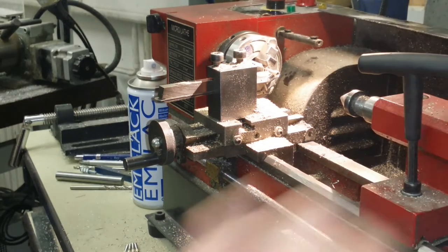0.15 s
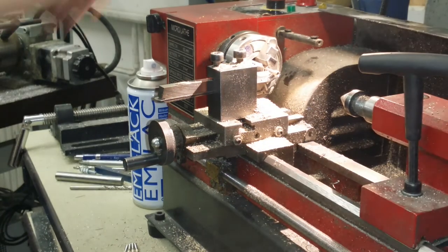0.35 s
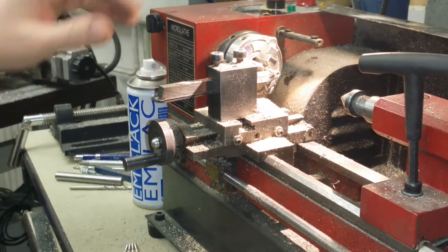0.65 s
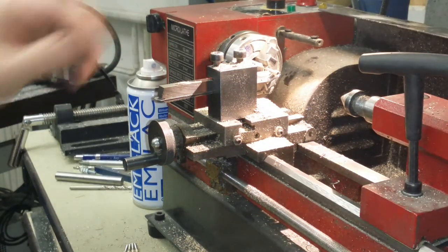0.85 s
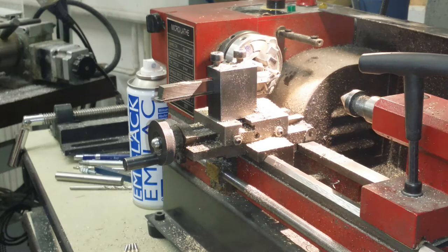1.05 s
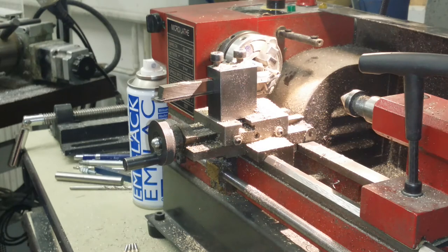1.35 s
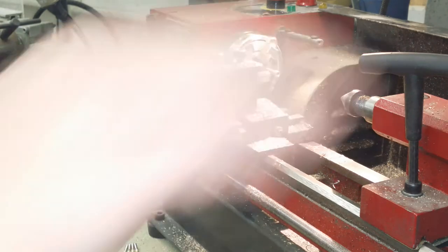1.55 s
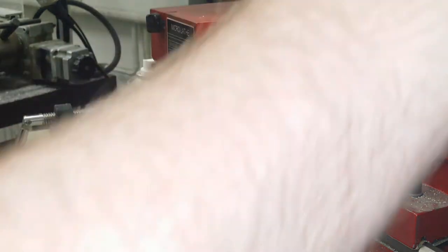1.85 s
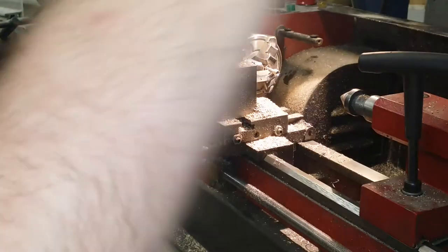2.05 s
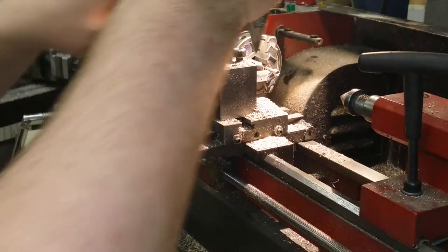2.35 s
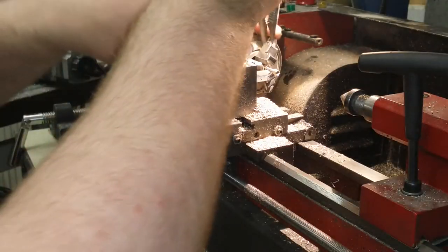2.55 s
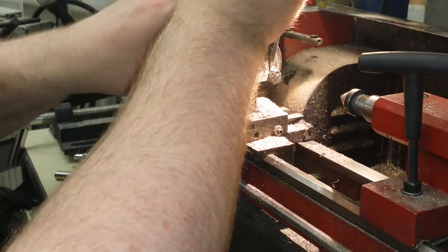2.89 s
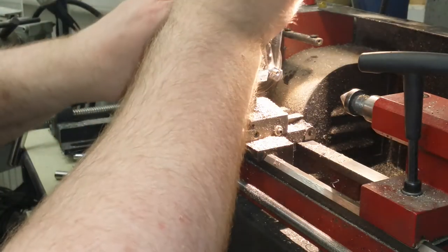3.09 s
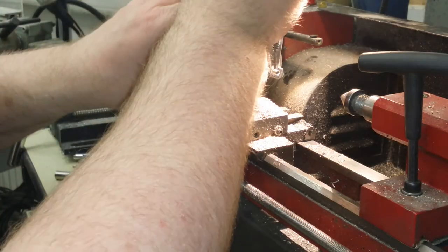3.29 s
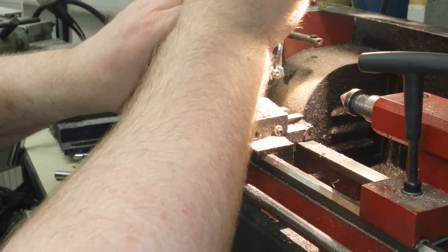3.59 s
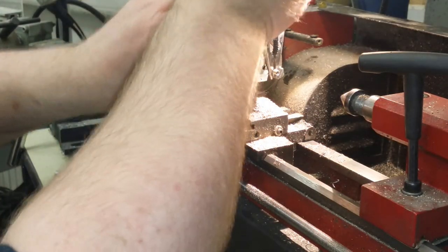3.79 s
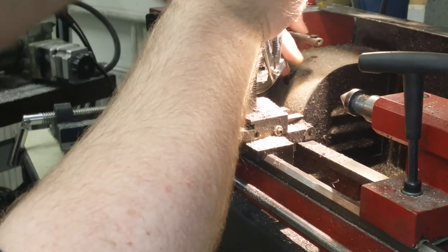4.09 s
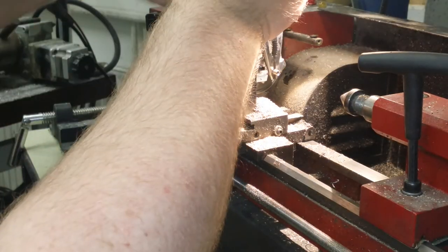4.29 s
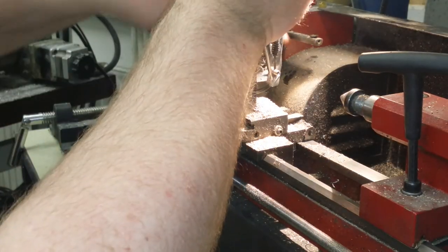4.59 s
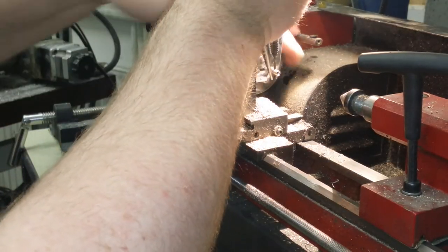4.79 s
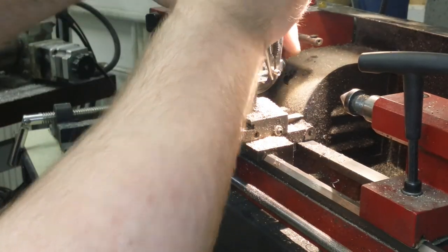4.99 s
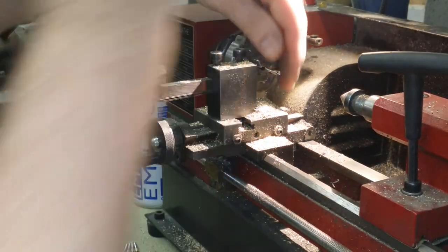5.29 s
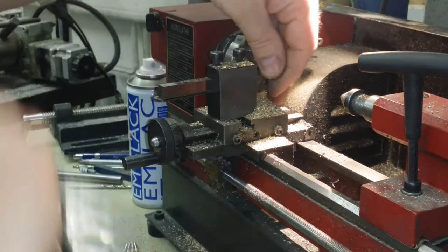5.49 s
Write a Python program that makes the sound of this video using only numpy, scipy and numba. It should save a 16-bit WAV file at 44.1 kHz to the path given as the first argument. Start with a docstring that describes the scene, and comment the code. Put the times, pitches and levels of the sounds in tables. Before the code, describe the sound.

An idle lathe's cooling fan whines steadily over mains hum and airy noise. About two seconds in, a tool rasps briefly across a gritty bench and knocks down hard, close on the right. The background dips after the blow and creeps back. Hands then work at the chuck, making soft knocks and bright clicks of small steel parts, with a sharper click near the end. The workshop adds a short echo.

```python
"""A cooling fan whines over mains hum in an idle lathe, its air noise resonating in the housing.
A tool is dragged off the bench, rasping on grit, and knocks down hard close on the right: the bench
rings and rumbles, and the microphone's gain control ducks and recovers. Hands then work at the chuck
with soft knocks and clicks of small steel parts. Faint rustles and a hiss come and go,
and the workshop walls echo the contacts."""
import sys
import numpy as np
from scipy import signal
from scipy.fft import rfft, irfft, next_fast_len
from scipy.io import wavfile
from scipy.ndimage import uniform_filter1d, map_coordinates
from numba import njit

SR = 44100
rng = np.random.default_rng(int(sys.argv[2]) if len(sys.argv) > 2 else 0)


def put_to_file(sound):
    """Save the sound as 16-bit audio at rate SR, in the file named by the first command-line argument."""
    columns = np.atleast_2d(sound).T  # one column per channel
    safe = np.clip(columns, -1, 1)
    whole_steps = np.round(safe * 32767)
    wavfile.write(sys.argv[1], SR, whole_steps.astype(np.int16))


N = 248724
TIME_S = np.arange(N) / SR
CHUCK_FROM_S, CHUCK_PAN_DB = 2.3, -5.5  # pan: left minus right


def amp(db):
    """dB to gain."""
    return 10 ** (np.asarray(db) / 20)


def unit(x):
    """Scale to rms 1."""
    return x / np.sqrt(np.mean(x ** 2) + 1e-20)


def along(points, hz):
    """Interpolate (Hz, value) points on a log axis."""
    f, v = np.transpose(points)
    return np.interp(np.log(hz + 1), np.log(f + 1), v)


def wobble(rate_hz):
    """Smooth random curve, rate_hz knots a second."""
    knots = rng.standard_normal(int(N * rate_hz / SR) + 4)
    return map_coordinates(knots, [np.arange(N) * rate_hz / SR])


def filtered(x, response):
    """Apply a complex frequency response."""
    n = x.shape[-1]
    m = next_fast_len(n + 8192)
    return irfft(rfft(x, m) * response(np.fft.rfftfreq(m, 1 / SR)), m)[..., :n]


def peak(f, hz, width_hz):
    """One resonance, gain 1 at its centre."""
    return 1j * f * width_hz / (hz * hz - f * f + 1j * f * width_hz)


def band(x, hz, width_hz):
    """Two-stage band-pass, scaled to rms 1."""
    return unit(filtered(x, lambda f: peak(f, hz, width_hz) ** 2))


def sides(pan_db):
    """Left and right gains, one row each."""
    return amp(np.array([[.5], [-.5]]) * pan_db)


def swells(rows, rest_db):
    """Resting gain plus one Gaussian hump per row."""
    humps = sum(amp(2 * db) * np.exp(-((TIME_S - s) / half_s) ** 2) for s, db, half_s in rows)
    return np.sqrt(amp(2 * rest_db) + humps)


def tone(hz, db, pan_db, lead_rad, waver_db, drift_rad):
    """Slightly unsteady stereo sine."""
    phase = 2 * np.pi * hz * TIME_S + drift_rad * wobble(6) + rng.uniform(0, 2 * np.pi)
    pair = np.sin(phase + np.array([[0], [lead_rad]]))
    return np.sqrt(2) * amp(db + waver_db * wobble(10)) * sides(pan_db) * pair


# Shaft harmonics: (multiple, level [dB], pan [dB], right lead [rad])
FAN_HARMONICS = [(6, -60, 1, 0.25), (7, -50.5, -10.5, 0.22), (8, -53, -7.5, 2.39)]


def fan_whine(shaft_hz=95.5):
    """Seven blades: the blade-pass tone and its two neighbours."""
    return sum(tone(k * shaft_hz, db, pan_db, lead_rad, waver_db=1.3, drift_rad=0.45)
               for k, db, pan_db, lead_rad in FAN_HARMONICS)


# Mains harmonics: (multiple, level [dB], pan [dB])
MAINS_HARMONICS = [(2, -52, -4.5), (6, -77.5, 24), (9, -65.5, 5.5), (17, -71, -16)]


def mains_hum(mains_hz=50):
    """Hum at multiples of the supply frequency."""
    return sum(tone(k * mains_hz, db, pan_db, lead_rad=0, waver_db=1.15, drift_rad=0.3)
               for k, db, pan_db in MAINS_HARMONICS)


# Fan and workshop air: (frequency [Hz], relative density [dB])
AIR_SPECTRUM = [(18, -52), (30, -18.5), (69, -18.5), (115, -15.5), (190, -8), (256, -7.5), (360, -15),
                (500, -6.5), (675, -3.5), (949, -12), (1370, -7), (3330, -21), (5620, -20), (7500, -27),
                (14400, -39), (15600, -34)]
# Housing resonances: (frequency [Hz], width [Hz], level [dB])
HOUSING_MODES = [(141, 24, -58.5), (237.4, 12, -52), (274.6, 14.6, -56), (553, 23, -62), (607, 22, -59.5),
                 (708, 110, -53.5), (1464, 305, -73), (2760, 650, -60.5), (5610, 470, -66.5),
                 (9020, 470, -70)]
# Air coherence: (frequency [Hz], left-right correlation)
AIR_COHERENCE = [(60, 0.82), (130, 0.94), (290, 0.83), (640, 0.44), (1410, -0.18), (3100, 0.16),
                 (6820, -0.22), (15000, 0.24)]
# Air balance: (frequency [Hz], pan [dB])
AIR_PAN = [(60, -18), (110, 7.5), (200, -10), (380, -6.5), (700, -3.5), (1290, -2), (2380, -3.5),
           (4400, 7.5), (8120, -4.5), (15000, -2)]


def fan_air():
    """Patchy air noise that resonates in the housing."""
    def colour(f):
        housing = sum(amp(2 * db) * SR / (np.pi * width_hz) * abs(peak(f, hz, width_hz)) ** 4
                      for hz, width_hz, db in HOUSING_MODES)
        return np.sqrt(amp(2 * (along(AIR_SPECTRUM, f) - 28.5)) + housing)

    def spread(f):
        angle = np.arccos(np.clip(along(AIR_COHERENCE, f), -1, 1)) / 2
        return [np.cos(angle), np.sin(angle)]

    spectra = signal.stft(rng.standard_normal((2, N)), nperseg=512)[2]
    patches = uniform_filter1d(rng.standard_normal(spectra.shape[1:]), size=6, axis=0)
    patches = uniform_filter1d(patches, size=12, axis=1)
    noise = signal.istft(spectra * amp(1.17 * unit(patches)), nperseg=512)[1][:, :N]
    mid, side = filtered(noise, lambda f: colour(f) * spread(f))
    air = filtered(np.array([mid + side, mid - side]), lambda f: sides(along(AIR_PAN, f)))
    return amp(.6 * wobble(2.5)) * air


# Rattle bands of the steel parts: (frequency [Hz], width [Hz], level [dB], t60 [s])
STEEL_BANDS = [(3120, 2200, -4, 0.041), (4420, 1400, -7, 0.035), (5020, 580, -6.5, 0.036),
               (5900, 970, -11.5, 0.064), (7900, 1300, -2, 0.04), (9500, 1800, -7, 0.028),
               (12170, 1700, -5.5, 0.026), (14500, 1500, -7, .035)]
# Clear rings of the same parts: (frequency [Hz], level [dB], t60 [s])
STEEL_PINGS = [(4080, -3, 0.051), (4400, -1.5, 0.041), (5065, -1, 0.059), (5800, -1.5, 0.074),
               (7950, -4, .06), (9200, -7, .06)]
# Steel click pitches: (time [s], level [dB], centre [Hz], roll-off [dB/octave]) # Rows a millisecond apart are
# two quick contacts, one just after the other.
CLICK_PITCHES = [(0.408, -56, 9500, 10), (1.846, -28.5, 11900, 11.5), (1.859, -38, 8400, 7),
                 (2.041, -44.5, 9460, 15), (2.055, -51, 7500, 4), (2.776, -45.5, 5600, 16),
                 (2.914, -31, 5120, 36), (2.916, -44, 9300, 14), (2.926, -33.5, 5670, 26),
                 (2.972, -52, 8000, 12), (2.997, -42, 5070, 42), (3.011, -40, 5100, 38),
                 (3.144, -39, 5970, 32.5), (3.389, -41.5, 3320, 11), (4.336, -45.5, 5600, 4),
                 (4.44, -54, 11000, 8), (4.821, -36, 4110, 45), (4.822, -42, 5730, 30),
                 (5.023, -49, 8500, 5.5), (5.069, -52, 7000, 5), (5.195, -25.5, 14500, 13.5),
                 (5.196, -26.5, 4400, 14), (5.26, -46, 4380, 40)]


def steel_clicks(ping_db=-6.5, ping_narrowing=4.6, tail_db=-15, attack_s=0.0012):
    """Steel on steel: the parts rattle and ping, most strongly near each row's pitch."""
    out, t = np.zeros((2, N + SR)), np.arange(SR // 9) / SR
    band_hz, width_hz, band_db, t60_s = np.transpose(STEEL_BANDS)[:, :, None, None]
    tail_t60_s = 0.27 * 5000 / band_hz
    fade = amp(-60 * t / t60_s) + amp(tail_db - 60 * t / tail_t60_s)
    band_gain = np.sqrt(2 * SR / (np.pi * width_hz))
    for s, db, centre_hz, rolloff in CLICK_PITCHES:
        loss_db = lambda hz: abs(rolloff * np.log2(hz / centre_hz))
        noise = rng.standard_normal((len(STEEL_BANDS), 2, len(t)))
        rings = filtered(noise, lambda f: peak(f, band_hz, width_hz) ** 2 * band_gain)
        rattle = (amp(band_db - loss_db(band_hz)) * fade * rings).sum(axis=0)
        pings = sum(amp(ping_db + ring_db - ping_narrowing * loss_db(hz) - 60 * t / ring_s)
                    * np.sin(2 * np.pi * hz * rng.normal(1, .006) * t)
                    for hz, ring_db, ring_s in STEEL_PINGS)
        click = amp(db) * (1 - np.exp(-t / attack_s)) * (rattle + pings)
        pan_db = -14 if s < CHUCK_FROM_S else -2.5
        out[:, round(s * SR):][:, :len(t)] += sides(pan_db) * click
    return out[:, :N]


# Hiss swells: (time [s], level [dB], half length [s])
HISS_SWELLS = [(1.2, -62, 0.217), (5.44, -60, 0.14)]


def hiss():
    """A faint narrow hiss comes and goes."""
    return swells(HISS_SWELLS, rest_db=-85) * band(rng.standard_normal((2, N)), hz=5520, width_hz=640)


# Treble swells: (time [s], level [dB], half length [s])
TREBLE_SWELLS = [(1.55, -64.5, 0.53), (3.39, -66, 0.051), (4.01, -61.5, 0.12), (4.37, -65, 0.13),
                 (5.23, -65.5, 0.0175)]


def treble_rustle():
    """Grainy rustles, and the bright fizz after the last loud click."""
    grain = rng.standard_normal((2, N)) * amp(2.0 * wobble(120))
    return swells(TREBLE_SWELLS, rest_db=-71.5) * band(grain, hz=13000, width_hz=9800)


# Balance of close sounds: (frequency [Hz], pan [dB])
NEAR_PAN = [(60, -16), (110, -17), (200, -14.5), (380, -11.5), (700, -14), (1290, -13.5), (2380, -5),
            (4400, 0), (8120, -12), (15000, -10)]


def near(x, lag_s=0.00036):
    """Close on the right: louder there, late on the left."""
    return filtered(x, lambda f: sides(along(NEAR_PAN, f)) * [np.exp(-2j * np.pi * f * lag_s), f ** 0])


# Bench modes: (frequency [Hz], level [dB], t60 [s])
BENCH_MODES = [(76, -28, 0.043), (137.6, -19, 0.089), (224, -10, 0.1), (327, 6, 0.031), (396, 3, 0.074),
               (487, -0.5, 0.097), (573, 10, 0.023), (622, -10.5, 0.046), (862, -5, 0.046),
               (1059, -3, 0.045), (1395, -3, 0.038), (1611, 1, 0.035), (1880, -5, 0.058),
               (2508, -3.5, 0.038), (3280, 0.5, 0.011)]


def bench_ring(t, centre_hz, rolloff, top_hz, build_cycles=0.31):
    """Bench modes, roughened by loose tools; a soft contact misses the high ones."""
    ring = np.zeros(len(t))
    for hz, db, t60_s in BENCH_MODES:
        octaves = np.log2(hz / centre_hz)
        polarity = np.sign(np.cos(np.pi * octaves))
        drive_db = -abs(rolloff * octaves) - 10 * np.log10(1 + (hz / top_hz) ** 8)
        decay = amp(db + drive_db + rng.normal(0, 0.15) - 60 * t / t60_s)
        build = 1 - np.exp(-t * hz / build_cycles)
        shiver_rad = 4e-5 * hz * np.cumsum(rng.standard_normal(len(t)))
        ring += polarity * decay * build * np.sin(2 * np.pi * hz * t + shiver_rad)
    return ring / abs(ring).max()


def stroke(centre_s, half_hold_s, rise_db_per_s, fall_db_per_s):
    """Drag gain: climbs, holds, drops as the tool lifts off."""
    early_s = np.maximum(centre_s - half_hold_s - TIME_S, 0)
    late_s = np.maximum(TIME_S - centre_s - half_hold_s, 0)
    return amp(-rise_db_per_s * early_s - fall_db_per_s * late_s)


# Grit rasp: (frequency [Hz], relative density [dB])
RASP_SPECTRUM = [(590, -15), (1000, -21), (1230, -14), (2450, -8), (4560, -15), (8290, -20.5), (11200, -26),
                 (12100, -25), (15600, -31)]


def tool_drag(start_s=1.77, end_s=1.903, shake_db=-23.5, rasp_db=-32):
    """Grit catches in short grains that shake the bench and rasp."""
    grit = rng.standard_normal((3, N)) * amp(2.1 * wobble(250))
    t = TIME_S[:SR // 20]
    ring = bench_ring(t, centre_hz=450, rolloff=47, top_hz=700) * amp(-60 * t / 0.173)
    shake = amp(shake_db) * unit(signal.fftconvolve(grit[0], ring)[:N])
    shake *= stroke(centre_s=1.858, half_hold_s=0.01, rise_db_per_s=440, fall_db_per_s=1500)
    rasp = amp(rasp_db) * unit(filtered(grit[1:], lambda f: amp(along(RASP_SPECTRUM, f))))
    rasp *= stroke(centre_s=1.868, half_hold_s=0.013, rise_db_per_s=320, fall_db_per_s=1700)
    touching = (TIME_S > start_s) & (TIME_S < end_s)
    return near(touching * (shake + rasp))


# Blows: (time [s], level [dB], centre [Hz], roll-off [dB/octave], upper reach [Hz])
BLOWS = [(1.797, -24.5, 77, 35, 200), (1.839, -24.5, 1500, 8, 3000), (1.8445, -15.5, 483, 21, 2000),
         (1.85, -25.5, 90, 24, 200), (1.8639, -15, 1020, 23, 3300), (1.8667, -16, 1900, 2.5, 3340),
         (1.9066, 1, 1501, 6, 4070), (1.928, -10, 404.7, 2, 800), (1.9334, -6.5, 432, 5, 900),
         (1.945, -22, 90, 25, 200), (1.958, -14.5, 600, 15, 1300), (2.78, -26, 243, -1, 900),
         (2.874, -21, 890, 12, 1500), (2.883, -23, 330, 14, 600), (3.1694, -28, 1180, 8, 2200),
         (3.175, -22, 416, 9, 1200), (3.202, -25.5, 450, -4, 810), (3.379, -30.5, 500, 7, 863),
         (3.405, -29.5, 1060, -6.5, 1284), (4.031, -32.5, 130, 18, 273), (4.074, -36, 130, 21.5, 200),
         (4.357, -35.5, 130, 18, 250)]


def knocks(crack_t60_s=.021):
    """Each blow rings the bench; harder contacts start faster and crack louder."""
    at_bench, at_chuck = np.zeros((2, 2, N + SR))
    t = np.arange(SR // 4) / SR
    for s, db, centre_hz, rolloff, top_hz in BLOWS:
        noise = rng.standard_normal(len(t)) + 1.1 * rng.standard_normal((2, len(t)))
        crack = filtered(noise, lambda f: peak(f, 3980, 2600) ** 3) * amp(-60 * t / crack_t60_s)
        crack_db = -32 + 14.5 * np.log2(top_hz / 1000)
        blow = bench_ring(t, centre_hz, rolloff, top_hz) + amp(crack_db) * crack
        attack = 1 - np.exp(-t * top_hz / 2)
        place = at_chuck if s > CHUCK_FROM_S else at_bench
        place[:, round(s * SR):][:, :len(t)] += amp(db) * attack * blow
    return near(at_bench[:, :N]) + sides(CHUCK_PAN_DB) * at_chuck[:, :N]


def body_note(start_s=1.9072, db=-9, from_hz=260, to_hz=560):
    """The hard blow's note slides up as the tool settles; a hand damps it."""
    attack_s, slide_s, t60_s = .001, .011, .35
    hold_s, mute_db_per_s = .018, 2000
    t = np.maximum(TIME_S - start_s, 0)
    hz = to_hz - (to_hz - from_hz) * np.exp(-t / slide_s)
    decay_db = 60 * t / t60_s + mute_db_per_s * np.maximum(t - hold_s, 0)
    envelope = amp(db - decay_db + 2.5 * wobble(150)) * (1 - np.exp(-t / attack_s))
    return near(envelope * np.sin(2 * np.pi * np.cumsum(hz * (t > 0)) / SR))


# Low rumbles: (time [s], level [dB], half length [s])
LOW_RUMBLES = [(1.97, -52, 0.06), (3.6, -65, 0.11), (4.3, -72, 0.65), (5.22, -68, .06)]


def low_rumble():
    """A low rumble follows the hard knock and swells faintly during handling."""
    rumble = band(rng.standard_normal(N), hz=56, width_hz=34)
    return swells(LOW_RUMBLES, rest_db=-83) * sides(-16) * rumble


# Hand strokes: (time [s], level [dB], half length [s])
HAND_RUBS = [(3.39, -54, 0.04), (5.085, -48, 0.032)]


def chuck_rub():
    """Dull friction of a hand on the chuck."""
    friction = band(rng.standard_normal(N), hz=490, width_hz=220)
    return swells(HAND_RUBS, rest_db=-90) * sides(CHUCK_PAN_DB) * friction


def blurred(x, rate_hz):
    """A wandering phase smears the pitch."""
    wander_rad = 1.5 * np.array([wobble(rate_hz), wobble(rate_hz)])
    return np.real(signal.hilbert(x) * np.exp(1j * wander_rad))


# Workshop decay: (frequency [Hz], t60 [s])
ROOM_DECAY = [(100, 0.76), (400, 0.41), (1500, 0.5), (6000, 0.52), (14000, 0.25)]


def workshop_echo(x, build_s=0.041, crossover_hz=900):
    """Wall reflections swell in, then each frequency dies at its own rate."""
    hz, t, spectra = signal.stft(rng.standard_normal((2, SR // 2)), SR, nperseg=256)
    swell = 1 - np.exp(-(t / build_s) ** 2)
    decay = amp(-60 * t / along(ROOM_DECAY, hz)[:, None])
    tail = signal.istft(spectra * swell * decay, SR, nperseg=256)[1]
    echo = signal.fftconvolve(x.mean(axis=0)[None], tail / np.linalg.norm(tail[0]), axes=1)[:, :N]
    bass = filtered(echo, lambda f: 1 / (1 + (f / crossover_hz) ** 4))
    return blurred(bass, 140) + blurred(echo - bass, 500)


def scene():
    """Handling noises and their echo over the steady fan."""
    bench = tool_drag() + knocks() + body_note()
    steel = steel_clicks()
    background = fan_whine() + mains_hum() + fan_air() + hiss()
    soft_noises = treble_rustle() + low_rumble() + chuck_rub()
    to_walls = filtered(bench, lambda f: peak(f, 1470, 7100))  # little thump or treble reaches them
    echo = sides(-3.0) * workshop_echo(amp(-6.5) * to_walls + amp(-10.5) * steel)
    return background + soft_noises + bench + steel + echo


@njit
def ducking(overload, depth_db, hold_s, attack_s, release_s):
    """Gain in dB: sinks on overload, holds, creeps back."""
    gain_db, now_db, hold_left = np.zeros(len(overload)), 0., 0
    for i in range(len(overload)):
        hold_left = round(hold_s * SR) if overload[i] else hold_left - 1
        if hold_left > 0:
            now_db += (depth_db - now_db) / (attack_s * SR)
        else:
            now_db -= now_db / (release_s * SR)
        gain_db[i] = now_db
    return gain_db


def record(dry):
    """Gain control, small-microphone bass cut, soft clip, band limit, slight DC offset."""
    bass_cut_hz, top_hz, ceiling = 45, 15700, .97
    overload = abs(dry).max(axis=0) > .8
    x = dry * amp(ducking(overload, depth_db=-11.5, hold_s=.9, attack_s=.07, release_s=.25))
    x = filtered(x, lambda f: (1j * f / (bass_cut_hz + 1j * f)) ** 2)
    x = x / (1 + abs(x / ceiling) ** 8) ** (1 / 8)
    return filtered(x, lambda f: 1 / (1 + (f / top_hz) ** 80)) - .0005


dry = scene()
out = record(dry)
put_to_file(out)
```